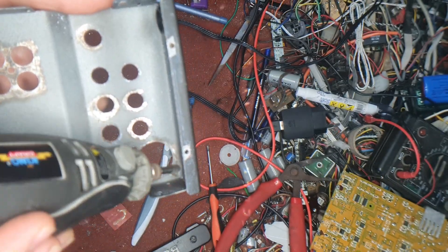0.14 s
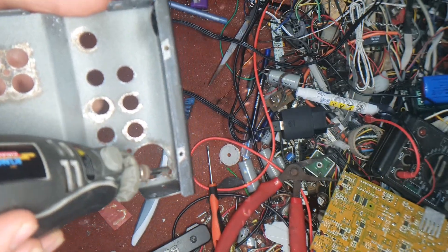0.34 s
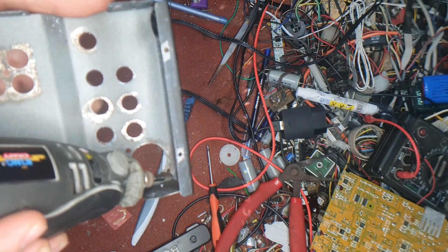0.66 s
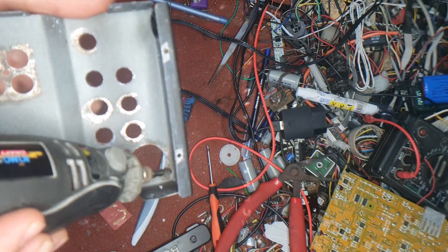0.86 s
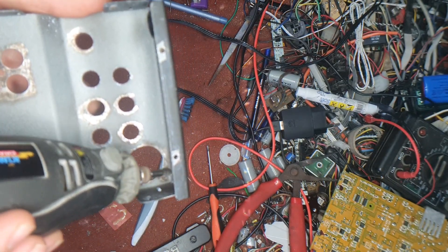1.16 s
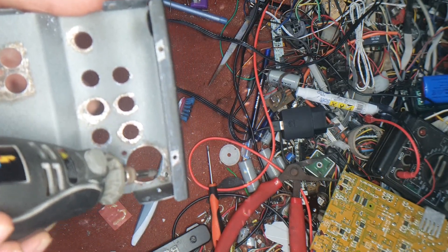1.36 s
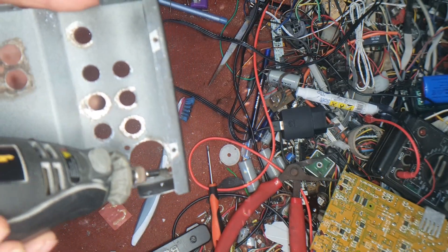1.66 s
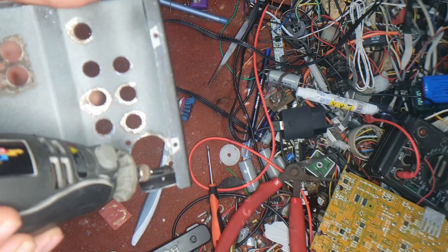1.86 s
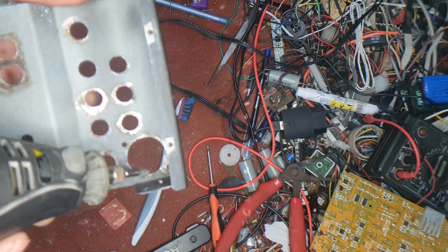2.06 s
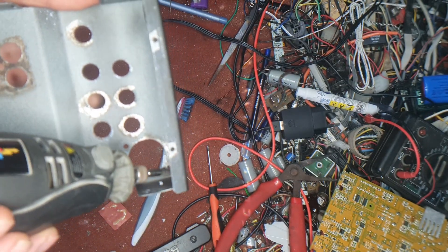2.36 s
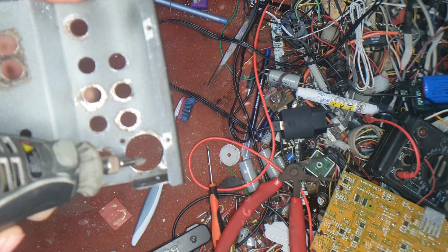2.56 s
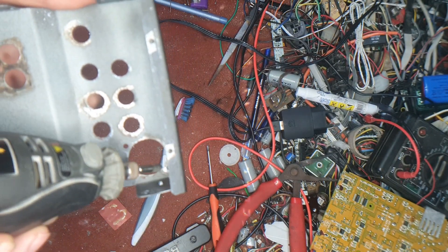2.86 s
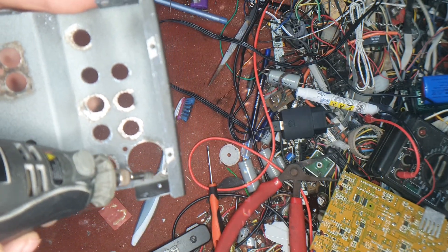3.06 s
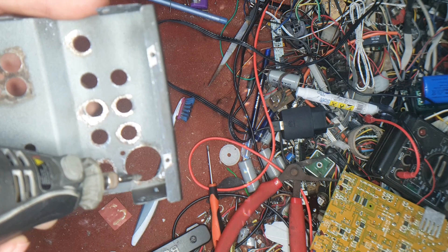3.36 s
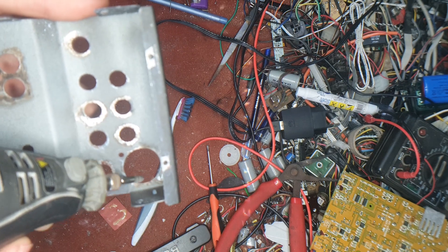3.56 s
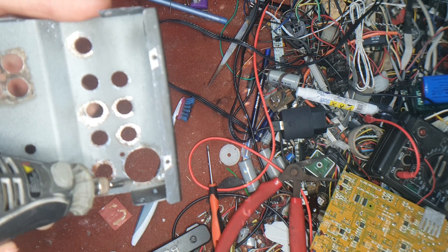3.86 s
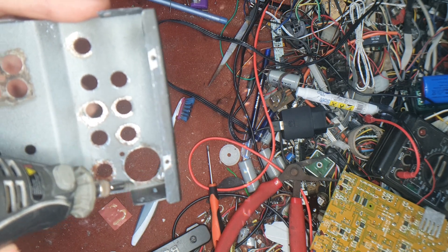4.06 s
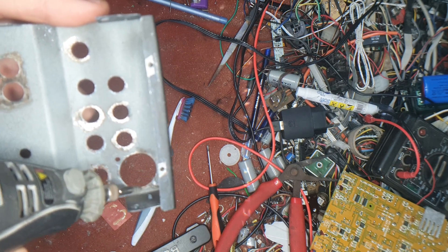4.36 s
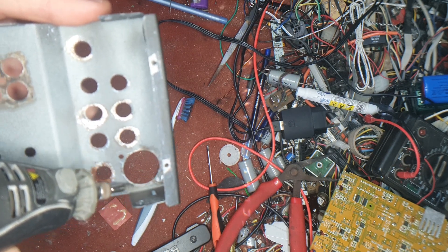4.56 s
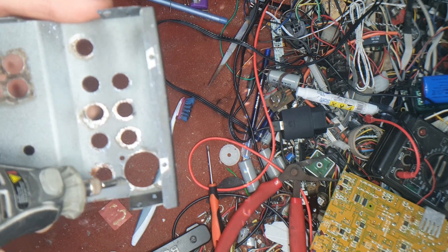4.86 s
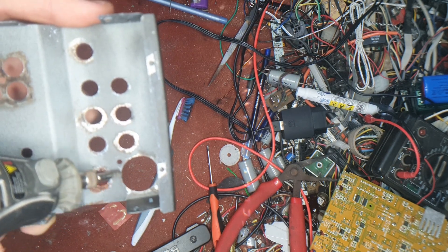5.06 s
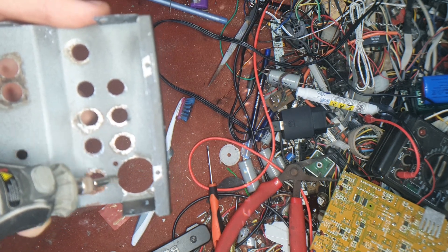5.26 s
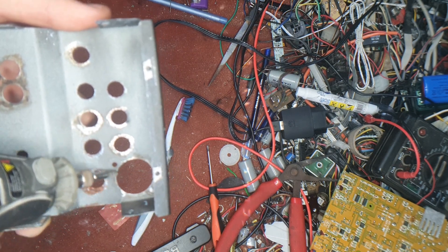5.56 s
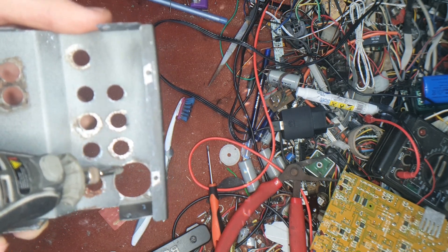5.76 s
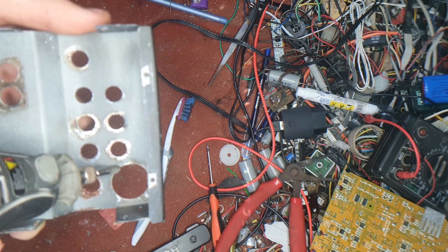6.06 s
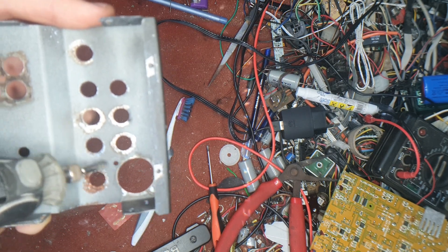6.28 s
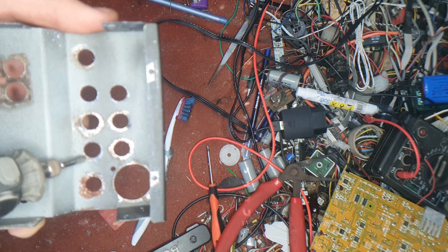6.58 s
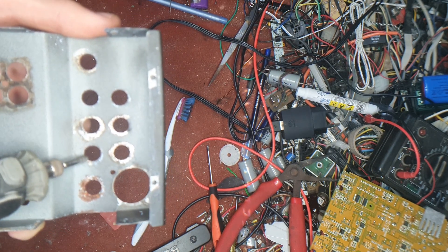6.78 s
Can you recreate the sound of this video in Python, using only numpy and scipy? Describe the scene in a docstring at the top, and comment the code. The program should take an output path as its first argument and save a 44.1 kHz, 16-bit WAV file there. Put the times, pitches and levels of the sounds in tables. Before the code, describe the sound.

A handheld rotary tool whines steadily up close while its spinning wire brush hisses and scrapes over a thin, ringing steel panel in repeated strokes.

```python
"""A handheld rotary tool whines close to two microphones while its wire brush scrubs a steel panel.
The shaft sings a stack of unsteady sine orders over the noise of its fan.
The wires are grainy noise, throbbing with the turn, and ring the panel's modes.
Strokes bear down and lift; now and then the wires catch an edge and a panel note grates.
Puffs of air, low lumpy noise, buffet the right port, strongest early on."""
import sys
import numpy as np
from scipy import signal
from scipy.fft import rfft, irfft, next_fast_len
from scipy.io import wavfile
from scipy.ndimage import uniform_filter1d

SR = 44100
rng = np.random.default_rng(int(sys.argv[2]) if len(sys.argv) > 2 else 0)


def generate_wav(signal):
    """Clip the signal to [-1, 1] and save it as 16-bit WAV at the path in sys.argv[1]."""
    frames = np.transpose(np.atleast_2d(signal))
    scaled = np.clip(frames, -1, 1) * 32767
    pcm = np.round(scaled).astype(np.int16)
    wavfile.write(sys.argv[1], SR, pcm)


N = 305172
STEP = 32  # samples per control point of the orders

# Shaft. Each row: time in seconds, speed in Hz, base level of order 1 in dB, of order 2 in dB.
SHAFT_S_HZ_DB = [(0.0, 402, -37, -33), (0.07, 407.4, -36, -30.5), (0.24, 402.7, -33, -26.5),
                 (0.52, 398.4, -35.5, -32.5), (0.93, 392.3, -34.5, -29.5), (1.0, 393.3, -35.5, -36),
                 (1.12, 402, -36.5, -34), (1.27, 397.4, -33, -28.5), (1.41, 399.2, -36, -33.5),
                 (1.66, 407, -34, -39), (1.76, 407.3, -31.5, -27), (1.95, 404.6, -32.5, -26.5),
                 (2.04, 399, -35.5, -37), (2.12, 406.2, -34.5, -37.5), (2.29, 408, -32, -28.5),
                 (2.54, 389.5, -34, -32), (2.66, 397, -36.5, -42.5), (2.81, 401.8, -34, -31.5),
                 (3.16, 409.7, -30.5, -33.5), (3.4, 408, -31, -27), (3.5, 408, -33, -32.5),
                 (3.625, 409, -32, -30), (3.65, 408, -32.5, -36.5), (3.87, 410, -32.5, -29.5),
                 (4.24, 409.3, -31.5, -26.5), (4.66, 403.6, -33.5, -29.5), (4.76, 404.2, -35, -33.5),
                 (4.91, 409.2, -33, -28), (5.35, 411.5, -32, -26.5), (5.54, 408.8, -34, -28.5),
                 (5.73, 409, -32.5, -27), (5.76, 408, -36, -31), (5.8, 409.6, -35.5, -29.5),
                 (6.35, 411, -32.5, -29), (6.84, 413.9, -31, -26.5), (6.92, 411.5, -32.5, -26.5)]
# Shaft and bearing orders, as multiples of the speed.
MULTIPLES = (1, 2, 2.614, 3, 3.374, 4, 4.275, 5, 6, 7, 8, 9, 10, 11, 12, 13, 14.3, 15, 16, 17, 18, 22, 23,
             24, 25, 27, 28, 29, 30, 31, 32, 33, 34, 35, 14, 19, 21, 26, 36, 37)
# Each row, one per multiple: nose-up left and right in dB, laid-flat left and right in dB,
# left lead in radians. Orders 1 and 2 take only their left-right balance from here.
ORDER_DB_RAD = [(-36.5, -31.5, -32, -25, 0.28), (-31.5, -34, -23.5, -28, 0.55), (-72, -39, -65, -81, -2),
                (-47, -40, -66, -36.5, 0.26), (-48.5, -39, -42.5, -46, 2), (-37, -54, -41, -73, 2),
                (-43, -42.5, -69, -83, 1.5), (-38, -33.5, -37, -37.5, -0.5),
                (-41.5, -38.5, -36.5, -44, -1.5), (-34, -50, -36.5, -43, 4.5), (-36.5, -37, -32, -37, 1),
                (-38, -42, -41, -54, 0.65), (-43, -38.5, -35.5, -37.5, -1.5), (-57, -42, -42.5, -47, 2.5),
                (-42.5, -41, -42.5, -45, 0.5), (-41.5, -72, -34.5, -40, 7.5), (-42, -63, -45, -33.5, -1.5),
                (-37, -38, -34, -40, -2.5), (-37.5, -45, -38, -42, 5), (-43, -42, -44, -36, -2),
                (-49, -48.5, -35, -33.5, 4), (-50, -44, -43, -46, -2), (-46, -55, -53, -52, -2),
                (-44, -43, -39, -47, 3.5), (-40.5, -49, -54, -61, -0.5), (-51, -57, -51, -56, 7.5),
                (-52, -52, -42, -52, 9), (-52, -52, -48, -49, -0.5), (-46, -55, -46, -48, 5.5),
                (-36, -33, -42, -50, 3.5), (-43, -42, -38, -41, -1), (-52, -52, -56, -58, 4),
                (-54, -48, -50, -54, 0), (-51, -49, -53, -52, -3), (-53, -50, -35, -47, 0),
                (-70, -65, -71, -66, 0.5), (-51, -46, -54, -51, 1.5), (-50, -53, -63, -62, -2),
                (-56, -54, -53, -56, 1), (-52, -54, -60, -58, 1)]
# Tool pose. Each row: time in seconds, laid flat from 0 to 1.
POSE_S = [(0, 0), (3, 0), (4.7, 0.17), (4.92, 0.99), (5.75, 0.95), (5.95, 0.43), (6.35, 0.44), (6.5, 0.7),
          (6.92, 0.99)]
# Drops of order 1. Each row: time in seconds, depth in dB.
DROPOUTS_S_DB = [(2.509, 22), (4.66, 32)]
# Multiples that flare.
FLARING = (3, 5, 6, 7, 8, 9, 10, 12, 15, 16, 32)
# One list per flaring multiple. Each row: centre in seconds, length in seconds, rise in dB
# before the mean rise is taken off.
FLARES_S_DB = [
    [(.9, 0.24, 1.5), (2.55, 0.18, -0.5)],
    [(.23, 0.095, 8.5), (.43, 0.097, 3), (.9, 0.18, 7), (1.35, 0.12, 9), (1.9, 0.08, 7), (2.45, 0.25, 4.5),
     (2.95, 0.17, 6), (3.8, 1, 3), (5.2, 0.81, 7.5), (6.2, 0.88, 6)],
    [(.7, 0.58, 3.5), (1.35, 0.24, 4), (2.55, 0.17, 3), (2.9, 0.15, 3), (5.2, 0.44, 5), (5.9, 0.98, 6.5)],
    [(3.0, 0.43, 3.5), (5.25, 0.87, 11.5)],
    [(.35, 0.18, 8), (.88, 0.18, 9), (1.27, 0.2, 10), (1.92, 0.26, 7.5), (2.42, 0.17, 10), (3.22, 0.61, 8),
     (3.8, 0.33, 7), (4.47, 0.65, 9.5), (5.7, 0.17, 4), (6.2, 0.22, 4), (6.75, 1, 6)],
    [(.1, .2, 4), (1.72, 0.22, 7), (2.17, 0.16, 11.5), (3.05, 0.7, 9), (3.7, .2, 1), (4.87, 0.47, 12.5),
     (5.6, 0.64, 10), (6.3, 0.49, 12.5)],
    [(.4, 0.96, 7), (4.7, 0.6, 4), (5.4, 0.4, 2), (6.35, .2, 0)],
    [(3.9, 0.16, 11.5), (5.15, 0.61, 10), (5.6, 0.46, 9.5), (6.08, 0.26, 6)],
    [(1.8, 0.18, 6), (3.6, .6, 4.5), (4.2, 0.45, 3), (5.25, 0.68, 3)],
    [(.5, 0.55, 8.5), (1.35, 0.35, 9), (2.7, 0.1, 10), (4.5, 0.3, 10.5), (6.0, 0.3, 6), (6.7, 0.86, 7.5)],
    [(.9, 0.49, 7), (1.8, .3, 7), (3.0, 0.29, 7), (5.2, 0.77, 1)],
]
# Multiples that grow as load slows the shaft, and their growth in dB per Hz of slowing.
LOADED_ORDERS = (3, 5, 6)
LOAD_DB_PER_HZ = (0.74, 0.2, 0.24)
# Relative spectra of fan air, wire hiss, tip sizzle, puffs. Each row: frequency in Hz, density in dB per Hz.
ROAR_HZ_DB = [(40, -44), (120, -34), (180, -26.5), (245, -18), (290, -29.5), (345, -8), (385, -5),
              (450, -4), (620, -5), (900, 0), (1400, -2.5), (2100, -4), (3200, -3), (4300, -7), (6500, -11),
              (7800, -34), (9500, -19), (13000, -39), (15800, -40)]
WIRES_HZ_DB = [(300, -60), (1000, -16), (3000, -2), (6300, 0), (7700, -14), (9000, -0.5), (12000, 1),
               (13300, -2.5), (14800, -3), (16000, -17)]
SIZZLE_HZ_DB = [(11000, -46), (13000, -13), (14200, 3), (16000, 2)]
BUFFET_HZ_DB = [(20, -21), (40, -0.5), (65, 2), (100, -4), (160, -17), (300, -33.5)]
# Panel modes. Each row: frequency in Hz, width in Hz, relative left level in dB, right in dB.
PANEL_HZ_DB = [(1110, 69, -27, -12), (1440, 21, -0.5, -4.5), (1690, 55, -3, -25), (1944, 155, 1.5, 3),
               (3014, 49, 0.5, 7), (3376, 82, 2, 5.5), (3680, 80, -3, 3.5), (3990, 100, -7, -5),
               (4580, 63, -18, -5.5), (5870, 25, 0, -5), (6300, 100, -31, -4), (7050, 40, -2, -14),
               (7700, 23, -20, -9), (8670, 71, -5.5, -9.5), (9840, 26, -24, -34), (10500, 120, -22, -15),
               (12400, 90, -17, -16), (14200, 200, -7, -10), (11700, 72, -49, -21), (14320, 140, -10, -1.5),
               (15360, 55, -33, -30)]
# Port balance of the noises. Each row: frequency in Hz, left minus right in dB.
BALANCE_HZ_DB = [(100, 9), (250, 10.5), (600, 2), (1300, 1.5), (2400, 1.5), (4400, 5.5), (8000, -0.5),
                 (15000, 2.5)]
# Port likeness of the noises. Each row: frequency in Hz, shared part of the power from 0 to 1.
ALIKE_HZ = [(150, 1), (600, 0.47), (1500, 0.33), (4000, 0.31), (15000, 0.34)]
# Dips where sound off the bench cancels the direct sound.
# Each row: frequency in Hz, width in Hz, left depth from 0 to 1, right depth (both capped at 0.95).
BENCH_HZ = [(498, 110, 0.85, 0.9), (727, 70, 1, 0.13), (910, 60, 0.36, 0.4), (1302, 86, 0.14, 1),
            (1584, 360, 0.5, 0), (2116, 107, 0.2, 0.84), (2305, 200, 0.4, 0.15)]
# Brush strokes. Each row: start in seconds, lift in seconds, panel ring in dB, wire hiss in dB.
STROKES_S_DB = [(0.0, 0.547, -29.5, -31.5), (0.507, 0.97, -27, -33), (1.015, 1.404, -28, -35),
                (1.69, 2.019, -25.5, -35), (2.092, 2.52, -26.5, -39), (2.779, 3.102, -29.5, -49),
                (3.099, 3.477, -30, -32), (3.694, 4.63, -32, -34), (4.716, 5.755, -27.5, -31.5),
                (5.817, 6.9, -37, -33)]
# Wires catching an edge. Each row: centre in seconds, length in seconds, hiss, ring, tip sizzle in dB.
CATCHES_S_DB = [(0.106, 0.053, -31, -26.5, -38), (0.208, 0.017, -34, -27, -37),
                (0.267, 0.024, -33, -35, -32), (0.328, .012, -35, -41, -34), (0.37, .05, -32, -42, -25),
                (.43, .04, -36, -38, -36), (0.482, .018, -27, -25, -27), (.575, .03, -34, -36, -33),
                (0.804, 0.064, -27.5, -41, -26), (0.866, .04, -34, -31, -37), (0.953, 0.053, -31, -34, -27),
                (1.282, 0.013, -31, -36, -36), (1.378, 0.075, -26.5, -34, -28),
                (2.014, 0.039, -28, -33, -29), (2.327, 0.049, -34, -29, -27), (2.512, 0.061, -31, -34, -34),
                (2.92, .02, -35, -36, -40), (3.0, 0.19, -32.5, -32, -46), (3.415, 0.0089, -28, -32, -34),
                (3.438, 0.011, -25, -34, -30), (3.428, .07, -28, -31, -32), (3.643, 0.027, -19.5, -21, -28),
                (4.439, 0.031, -26, -42, -40), (4.604, 0.038, -39, -43, -38), (4.875, .01, -27, -33, -34),
                (5.011, 0.0095, -27, -28, -34), (5.084, .006, -28, -36, -34),
                (5.155, 0.0085, -27, -36, -34), (5.491, 0.038, -32, -30, -37),
                (5.755, 0.021, -18.5, -18, -27), (5.899, .015, -36, -30, -37), (6.08, .015, -39, -36, -37),
                (6.384, 0.021, -29, -30, -36), (6.554, 0.06, -24.5, -26, -40),
                (6.721, 0.037, -24, -32, -37), (6.832, 0.1, -25, -29, -44)]
# Panel notes set grating by a catch. Each row: centre in seconds, length in seconds, pitch in Hz, level in dB.
GRATES_S_HZ_DB = [(0.469, 0.041, 3350, -33), (1.931, 0.061, 3340, -34), (3.05, 0.052, 3260, -31.5),
                  (3.635, .02, 3315, -30), (3.647, 0.026, 3007, -27), (3.648, 0.024, 1900, -31),
                  (5.74, .03, 3314, -28), (5.752, .015, 2090, -25.5), (6.84, .06, 3350, -30),
                  (6.56, 0.065, 3350, -26), (6.716, .04, 3367, -28), (6.845, 0.082, 5906, -31),
                  (6.6, 0.16, 5910, -36)]
# Air puffs on the right port. Each row: time in seconds, level in dB.
PUFFS_S_DB = [(0.0, -21), (0.149, -34), (.26, -36), (.42, -41), (.55, -42), (0.721, -38), (.84, -33),
              (0.949, -38), (1.03, -33), (1.15, -49), (1.27, -40), (1.44, -45), (2.019, -45), (2.12, -52),
              (2.4, -56), (2.75, -72), (3.04, -61), (3.4, -58), (3.95, -62), (4.33, -53), (4.45, -60),
              (4.6, -52), (4.75, -53), (5.1, -56), (5.45, -55), (5.72, -50), (5.85, -58), (6.21, -48),
              (6.3, -55), (6.86, -49)]

DROPOUT_S = 0.006  # half length
# Orders over which a line turns to narrow noise; rate of its wavering.
CLEAN_ORDERS, WAVER_HZ, WAVER_HZ_PER_ORDER = 4.5, 50, 3
WAVER_POWER = 0.22  # wavering shared by the ports, and again on the left
EVEN, EVEN_ORDERS = 0.7, 14  # wavering turned from size into phase, fading over these orders
# Orders other than 1 and 2 flicker; those without flares also wander.
FLICKER_DB, FLICKER_DB_PER_ORDER, FLICKER_HZ = 1.2, 0.09, 25
WANDER_DB, WANDER_HZ = 2, 2.486
FAN_DB, AIR_PATCHES_DB, AIR_FLUTTER_DB = -28, 2.2, 1.2  # level; drift of colour, of level
FAN_THROB = 0.34  # once a turn
PRESS_S, LIFT_S = 0.23, 0.034  # time constants of bearing down, of letting go
IDLE_DB = -37  # wires whirring free
BITE_DB, RUNOUT, SPOTS_DB = 2.6, 0.22, 1.8  # uneven stroke; throb once and twice a turn; spot colour
STROKE_SIZZLE_DB = -24  # against the hiss of a stroke
SILENT_HZ = 600  # the small panel radiates little below this
GRATE_HZ = 180  # width of a grating note
PUFF_S, STILL_DB = 0.05, -60  # half length of a puff; air between puffs
LUMPS_DB, DRIFT_DB = 3, 2  # unevenness of the air, fast; of the air between puffs, slow
TOP_HZ = 15860


def amp(db):
    """dB to gain."""
    return 10 ** (np.asarray(db) / 20)


def unit(x):
    """Scale to rms 1."""
    return x / np.sqrt(np.mean(x ** 2) + 1e-20)


def along(points, hz):
    """Interpolate (Hz, value) points on a log axis."""
    f, v = np.transpose(points)
    return np.interp(np.log(hz + 1), np.log(f + 1), v)


def curves(rows):
    """One value per sample for each column after the time."""
    s, *cols = np.transpose(rows)
    return [np.interp(np.arange(N) / SR, s, c) for c in cols]


def bumps(rows, step=1):
    """Sum bell-shaped swells from (s, length s, height) rows, read every step samples."""
    t = np.arange(0, N, step) / SR
    return sum(height * np.exp(-(2 * (t - s) / length) ** 2) for s, length, height in rows)


def wobble(rate_hz, step=1):
    """Random curve with rate_hz knots a second, read every step samples."""
    knots = rng.standard_normal(2000)
    return np.interp(np.arange(0, N, step) * min(rate_hz, 280) / SR, np.arange(len(knots)), knots)


def soft_wobble(rate_hz):
    """Smoothed random curve at control rate."""
    return uniform_filter1d(wobble(rate_hz, STEP), size=int(SR / STEP / rate_hz))


def drift(rate_hz):
    """Random complex path: wavers in size and phase."""
    return soft_wobble(rate_hz) + 1j * soft_wobble(rate_hz)


def motor(turns):
    """Each shaft order is a sine whose size and phase waver, the more the higher it lies."""
    speed_hz, first_db, second_db = curves(SHAFT_S_HZ_DB)
    dropout_db = bumps([(s, 2 * DROPOUT_S, db) for s, db in DROPOUTS_S_DB])
    swell_db = {1: first_db - dropout_db, 2: second_db}
    flare_db = {k: bumps(rows, STEP) for k, rows in zip(FLARING, FLARES_S_DB)}
    load_db_per_hz = dict(zip(LOADED_ORDERS, LOAD_DB_PER_HZ))
    control_hz = speed_hz[::STEP]
    slowing_hz = control_hz.mean() - control_hz
    flat = np.clip(curves(POSE_S)[0][::STEP], 0, 1)
    fine, coarse = np.arange(N), np.arange(0, N, STEP)
    out = np.zeros((2, N))
    for k, (*levels_db, lead_rad) in zip(MULTIPLES, ORDER_DB_RAD):
        db = np.outer(levels_db[:2], 1 - flat) + np.outer(levels_db[2:], flat)
        if k in swell_db:
            db += swell_db[k][::STEP] - db.mean(0)
        else:
            flicker_db = FLICKER_DB + FLICKER_DB_PER_ORDER * min(k, 24)
            db += flicker_db * wobble(FLICKER_HZ, STEP)
            db += (k not in flare_db) * WANDER_DB * wobble(WANDER_HZ, STEP)
            db += load_db_per_hz.get(k, 0) * slowing_hz
        if k in flare_db:
            db += flare_db[k] - flare_db[k].mean()

        steady = np.exp(-max(k - 2, 0) / CLEAN_ORDERS) * 0.97
        rate_hz = WAVER_HZ + WAVER_HZ_PER_ORDER * k
        waver_gain = np.sqrt(WAVER_POWER * (1 - steady))
        common = np.sqrt(steady) + waver_gain * drift(rate_hz)
        # the paths to the ports differ and shift with the hand
        apart = np.exp(1j * (min(k - 1, 8) * 0.073 * wobble(1.12, STEP) - lead_rad))
        paths = np.array([common + waver_gain * drift(rate_hz), common * apart])
        evening = (np.abs(paths) + 1e-9) ** (EVEN * np.exp(-k / EVEN_ORDERS))
        size = np.sqrt(2) * amp(db) * paths / evening

        angle = (2 * np.pi * ((k * turns + rng.random()) % 1)).astype(np.float32)
        cos, sin = np.cos(angle), np.sin(angle)
        for port, s in enumerate(size):
            out[port] += np.interp(fine, coarse, s.real) * cos - np.interp(fine, coarse, s.imag) * sin
    return out


def filtered(x, response):
    """x through a complex response of frequency."""
    m = next_fast_len(N + SR // 2)
    return irfft(rfft(x, m) * response(np.fft.rfftfreq(m, 1 / SR)), m)[..., :N]


def bench(hz):
    """Left and right gains of the bench cancellation dips."""
    gain = 1
    for centre_hz, width_hz, left, right in BENCH_HZ:
        depth = np.clip([[left], [right]], 0, 0.95)
        gain = gain * (1 - depth * np.exp(-(2 * (hz - centre_hz) / width_hz) ** 2))
    return gain


def heard(shared, own, colour, lead_s):
    """Two ports: a shared part reaching the left first, plus a part of their own; rms 1."""
    side = np.array([[1], [-1]])
    like = lambda hz: np.clip(along(ALIKE_HZ, hz), 0, 1)
    tilt = lambda hz: colour(hz) * amp(side * along(BALANCE_HZ_DB, hz) / 2) * bench(hz)
    lead = lambda hz: np.exp(1j * np.pi * hz * lead_s * side)
    both = filtered(shared, lambda hz: tilt(hz) * np.sqrt(like(hz)) * lead(hz))
    return unit(both + filtered(own, lambda hz: tilt(hz) * np.sqrt(1 - like(hz))))


def patchy(x, depth_db, wide, long):
    """Noise whose colour keeps changing in patches of wide bins by long frames."""
    z = signal.stft(x, nperseg=512)[2]
    field = uniform_filter1d(rng.standard_normal(z.shape[1:]), wide, 0)
    field = uniform_filter1d(field, long, 1)
    return signal.istft(z * amp(depth_db * unit(field)), nperseg=512)[1][:, :N]


def fan(turns):
    """Cooling air rushes through the vents: shaped noise throbbing once a turn."""
    air = patchy(rng.standard_normal((3, N)), depth_db=AIR_PATCHES_DB, wide=4, long=8)
    air = air * (1 + FAN_THROB * np.cos(2 * np.pi * turns))
    level_db = FAN_DB + 1.07 * wobble(9) + AIR_FLUTTER_DB * wobble(40)
    return amp(level_db) * heard(air[0], air[1:], lambda hz: amp(along(ROAR_HZ_DB, hz)), lead_s=0.00009)


def contact():
    """Gains of hiss, ring, sizzle: strokes bear down slowly, lift fast; catches add power on top."""
    t = np.arange(N) / SR
    held = np.zeros((3, N))
    for start_s, lift_s, ring_db, hiss_db in STROKES_S_DB:
        press = 1 - np.exp(-np.clip(t - start_s, 0, None) / PRESS_S)
        release = np.exp(-np.clip(t - lift_s, 0, None) / LIFT_S)
        held += np.outer(amp([hiss_db, ring_db, hiss_db + STROKE_SIZZLE_DB]), press * release)
    held = held * amp(BITE_DB * wobble(45))
    catch_power = bumps([(s, length, amp(levels_db)[:, None] ** 2) for s, length, *levels_db in CATCHES_S_DB])
    idle_power = amp(2 * IDLE_DB) * np.array([[1], [1], [0]])
    return np.sqrt(idle_power + held ** 2 + catch_power)


def panel(hz):
    """Left and right response: resonances of alternating sign, weak below SILENT_HZ."""
    modes = 0
    for k, (centre_hz, width_hz, left_db, right_db) in enumerate(PANEL_HZ_DB):
        damping = 1j * hz * width_hz
        resonance = damping / (centre_hz * centre_hz - hz * hz + damping)
        modes = modes + (-1) ** k * amp([[left_db], [right_db]]) * resonance
    return modes / (1 + (SILENT_HZ / (hz + 1)) ** 4)


def grating(tips):
    """Panel notes: narrow bands of the tip noise under bell-shaped swells."""
    out = np.zeros((2, N))
    for s, length_s, pitch_hz, db in GRATES_S_HZ_DB:
        band = lambda hz: np.exp(-(2 * (hz - pitch_hz) / GRATE_HZ) ** 2)
        out += bumps([(s, length_s, amp(db))]) * unit(filtered(tips[1:] + tips[0], band))
    return out


def brush(turns):
    """Wire tips strike in dense uneven grains, most where the brush runs out of true; the panel rings."""
    angle = 2 * np.pi * turns + 1.55 * wobble(4.9)
    bite = (1 + RUNOUT * (np.cos(angle) + np.cos(2 * angle))) * amp(1.4 * wobble(140))
    tips = bite * rng.standard_normal((3, N)) * amp(5.5 * rng.standard_normal((3, N)))
    tips = patchy(tips, depth_db=SPOTS_DB, wide=3, long=24)  # other spots favour other modes
    hiss = heard(tips[0], tips[1:], lambda hz: amp(along(WIRES_HZ_DB, hz)), lead_s=0.00013)
    ring = heard(tips[0], tips[1:], panel, lead_s=0.00016)
    sizzle = heard(tips[0], tips[1:], lambda hz: amp(along(SIZZLE_HZ_DB, hz)), lead_s=0.0001)
    hiss_gain, ring_gain, sizzle_gain = contact()
    return hiss_gain * hiss + ring_gain * ring + sizzle_gain * sizzle + grating(tips)


def draught():
    """Puffs of air: low lumpy noise on the right port alone."""
    lumps = amp(LUMPS_DB * wobble(11) + 2.6 * wobble(22))
    air = filtered(rng.standard_normal(N), lambda hz: amp(along(BUFFET_HZ_DB, hz)))
    still = amp(STILL_DB + DRIFT_DB * wobble(1.98))
    puffs = still + bumps([(s, 2 * PUFF_S, amp(db)) for s, db in PUFFS_S_DB])
    return np.outer([0, 1], puffs * unit(lumps * air))


def scene():
    """Sum tool, brush and air."""
    turns = np.cumsum(curves(SHAFT_S_HZ_DB)[0]) / SR
    return motor(turns) + fan(turns) + brush(turns) + draught()


def record(dry):
    """Keep nothing from the band limit up."""
    return filtered(dry, lambda hz: hz < TOP_HZ)


dry = scene()
out = record(dry)
generate_wav(out)
```